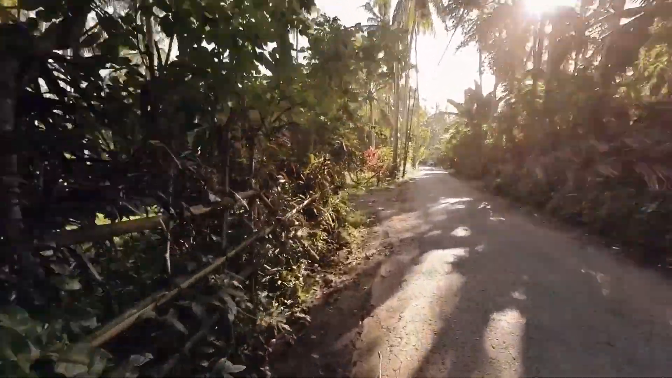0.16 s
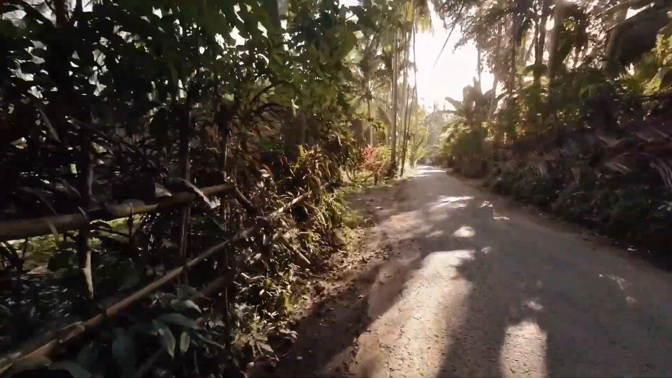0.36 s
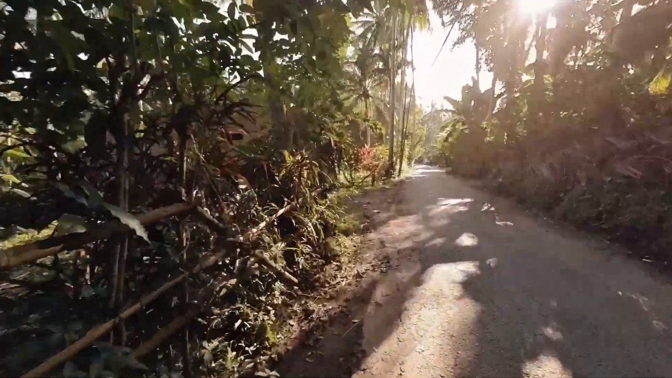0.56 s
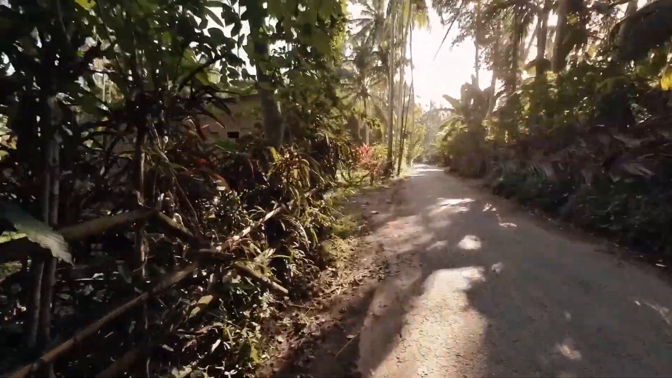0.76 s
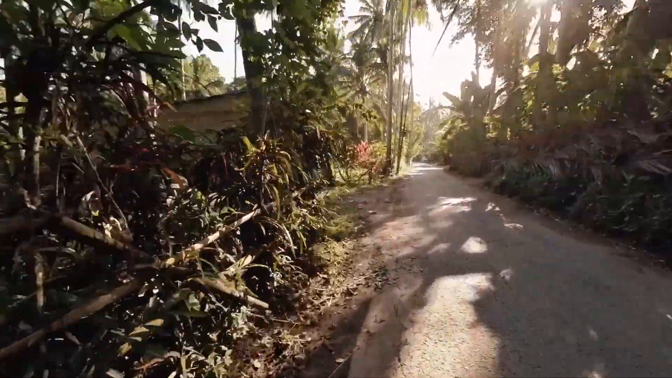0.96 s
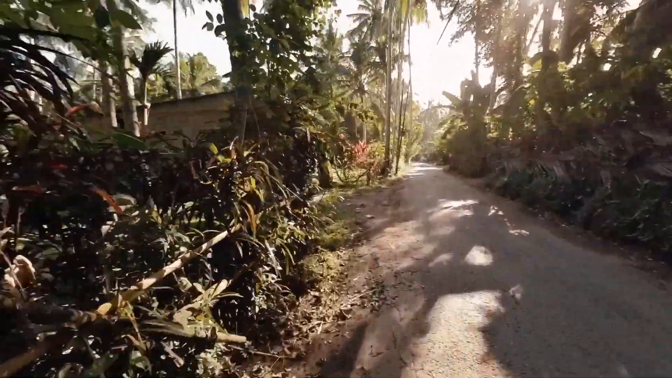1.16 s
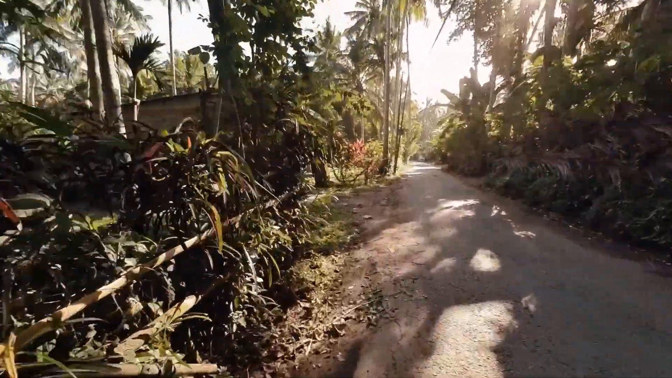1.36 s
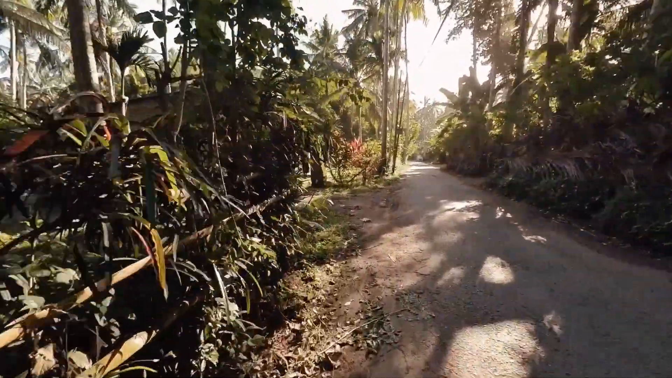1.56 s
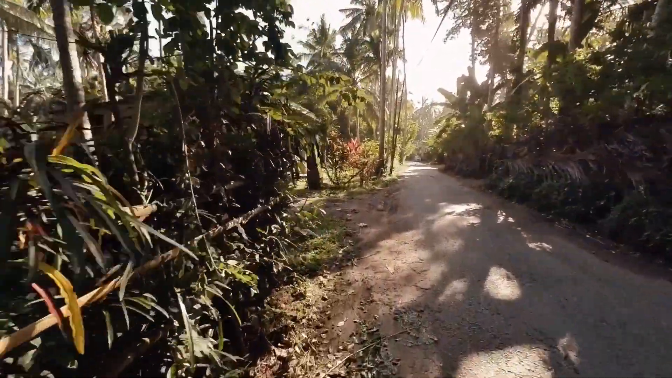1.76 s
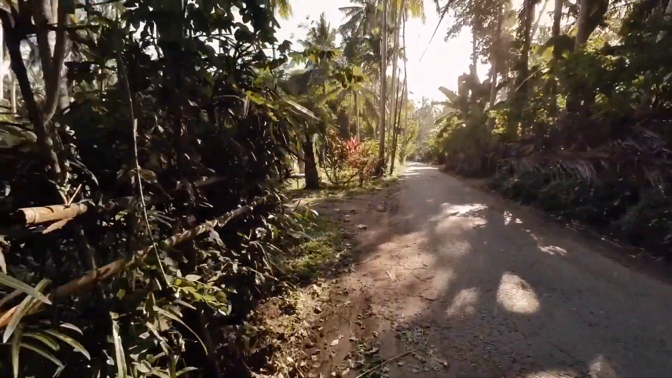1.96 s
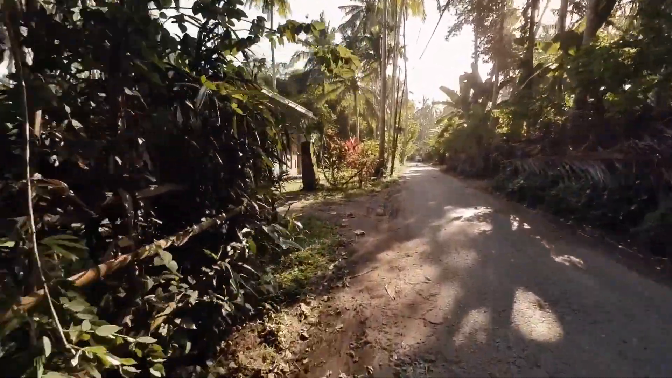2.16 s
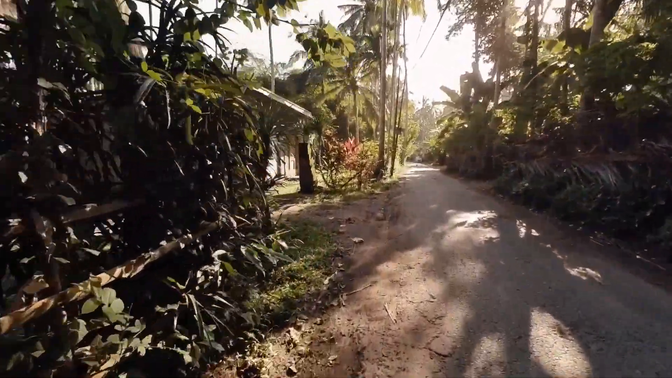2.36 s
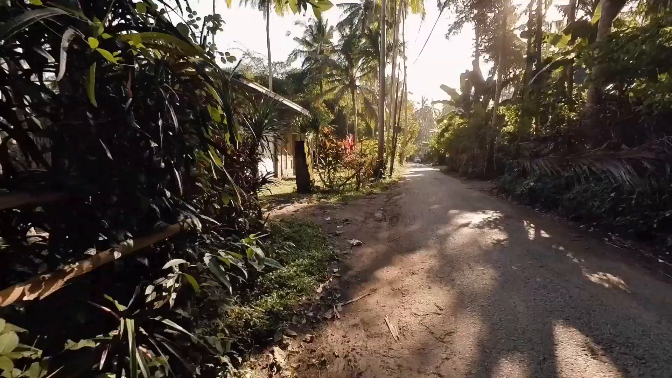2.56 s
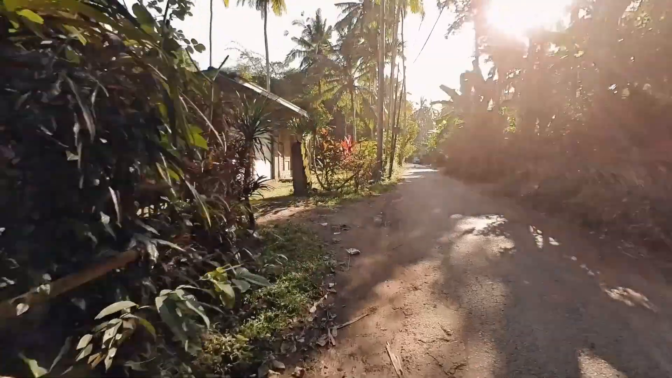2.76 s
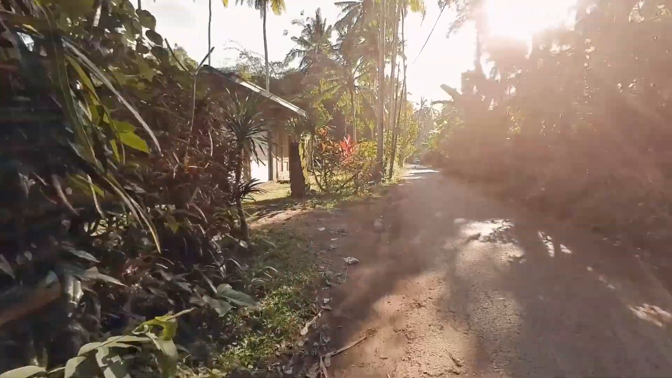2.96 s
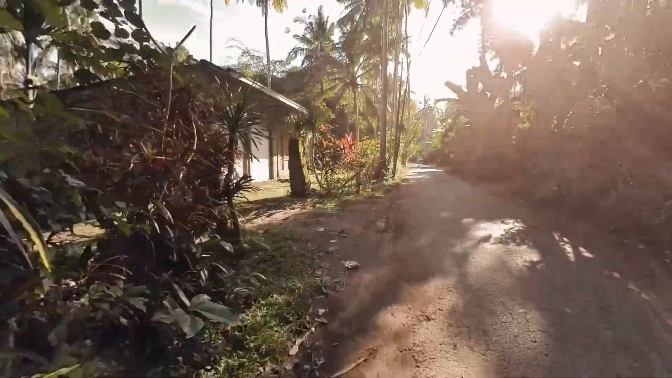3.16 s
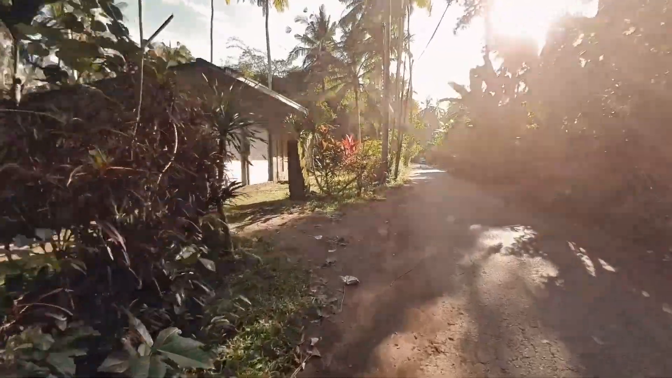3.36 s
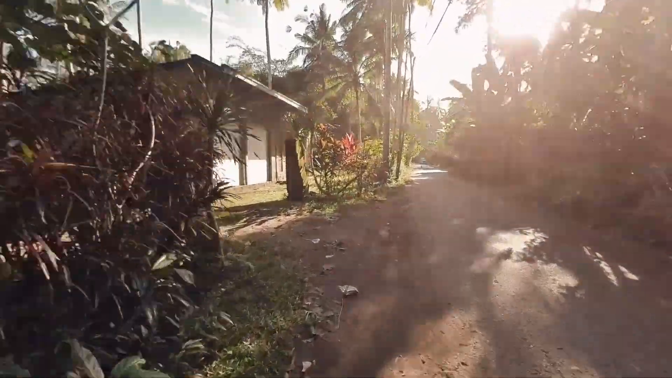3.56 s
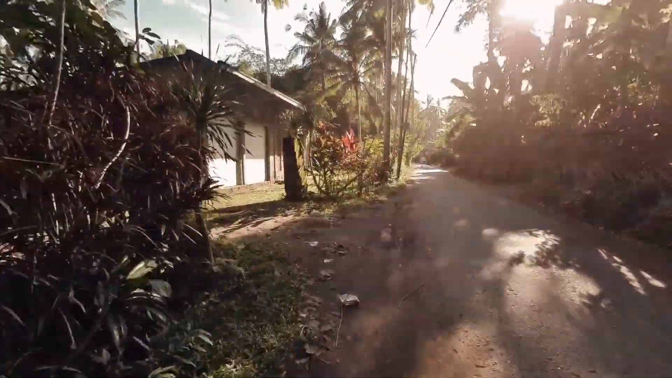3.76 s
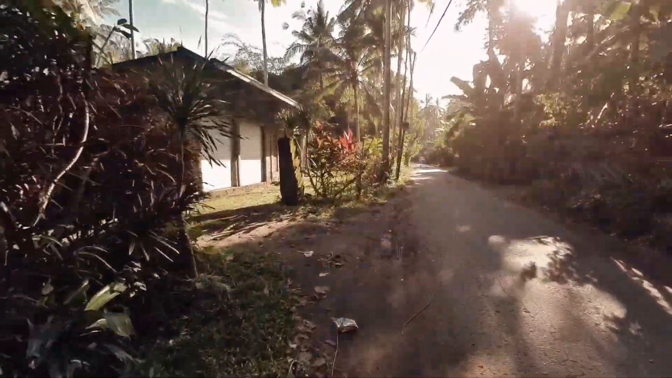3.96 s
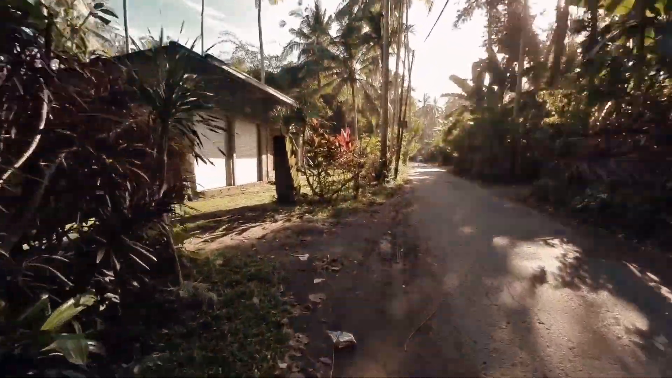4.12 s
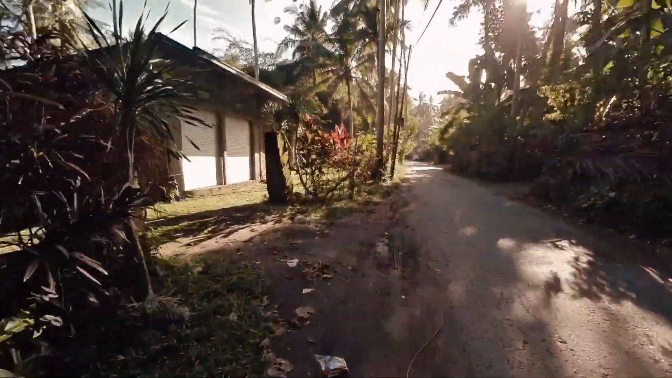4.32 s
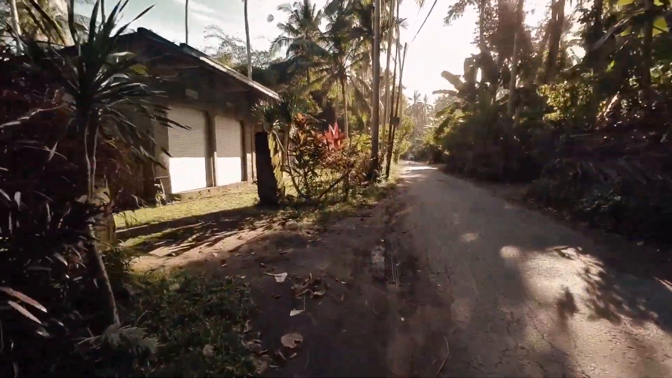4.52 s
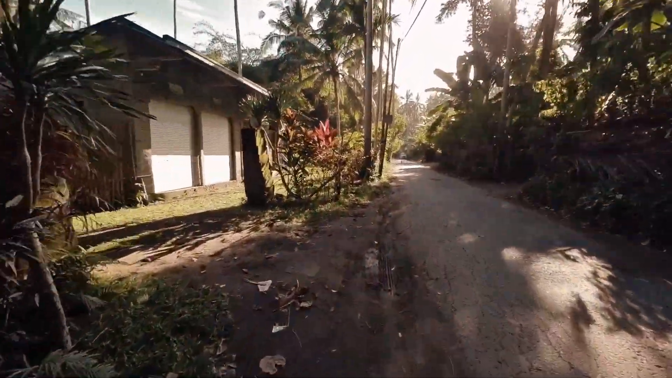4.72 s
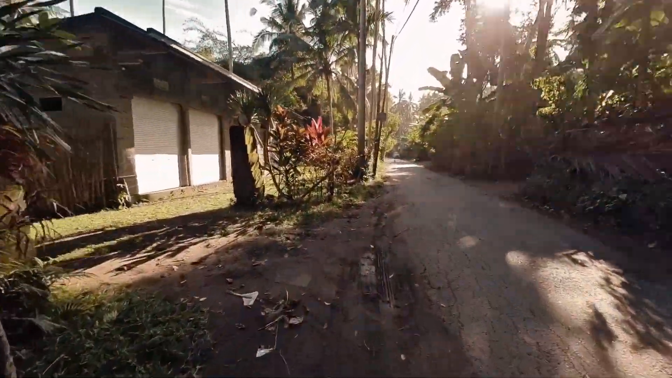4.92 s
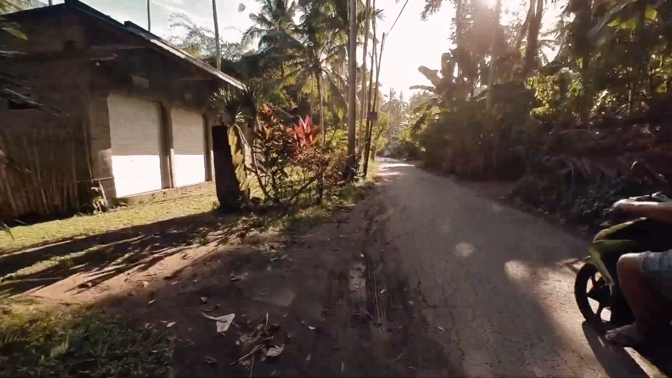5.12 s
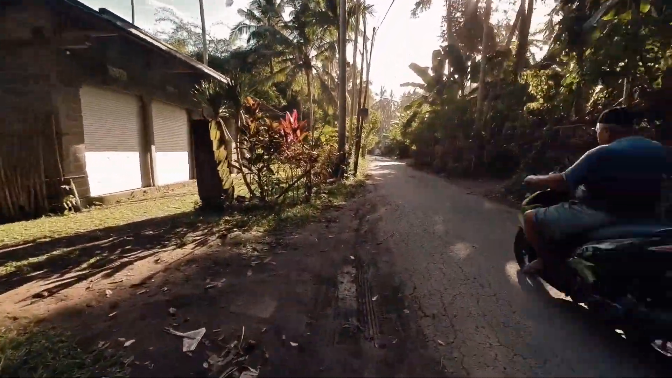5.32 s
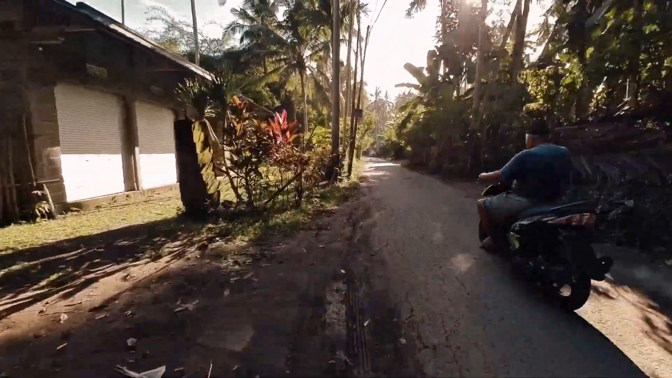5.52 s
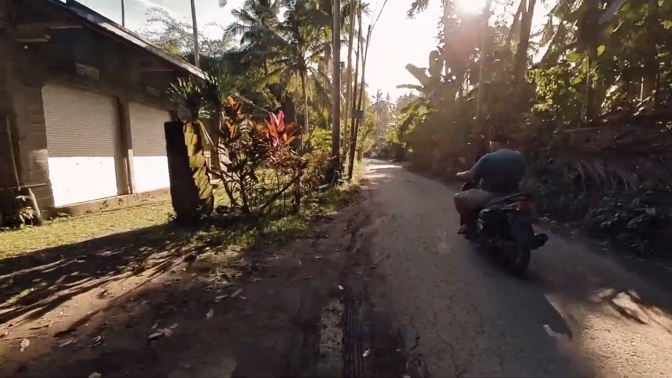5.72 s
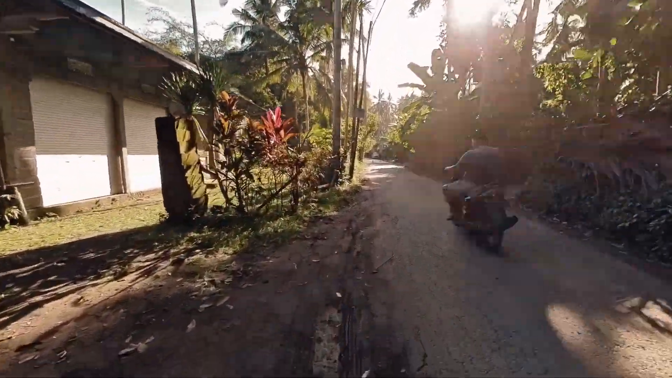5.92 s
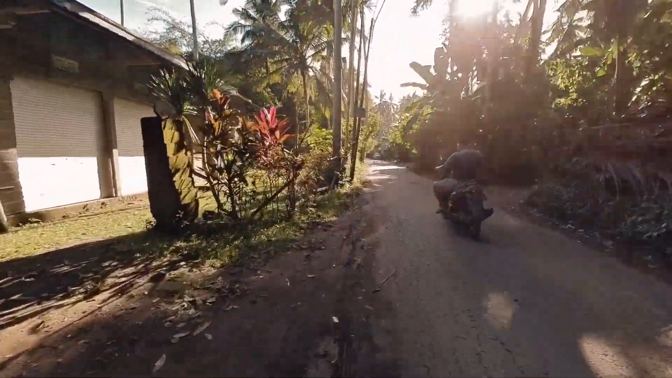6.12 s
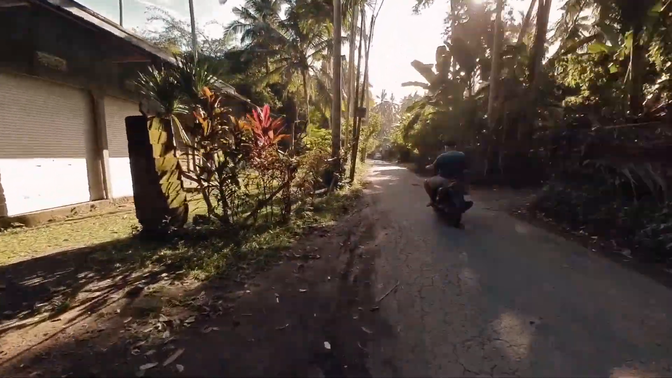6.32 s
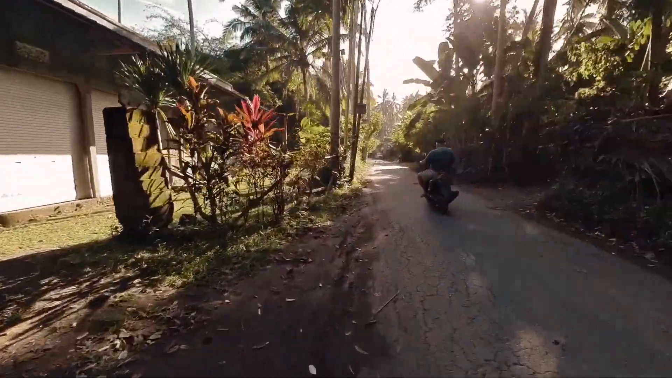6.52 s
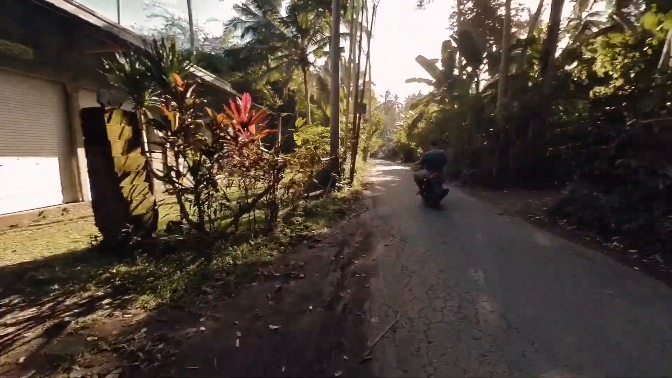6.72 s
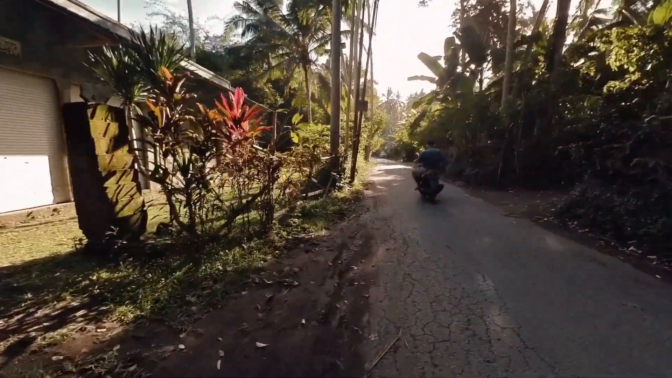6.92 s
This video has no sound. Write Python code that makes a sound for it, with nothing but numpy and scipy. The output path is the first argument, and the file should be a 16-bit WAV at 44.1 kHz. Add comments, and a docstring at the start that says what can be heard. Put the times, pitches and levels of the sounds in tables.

```python
"""A walker's steps thump and scuff softly on a narrow lane while the trees rustle. From behind comes a
small single-cylinder motorbike, barely above idle: its firings drone in the silencer, its piston knocks,
its valves tick and its tyres crunch over grit. About five seconds in it passes close by, with hard engine
knocks and soft metallic rattles. The pipe's mouth comes into view, so the drone grows louder and deeper;
then the bike rolls away, its gears whining faintly, with a short echo from trunks and walls."""
import sys
import numpy as np
from scipy import signal
from scipy.fft import rfft, irfft, next_fast_len
from scipy.io import wavfile
from scipy.ndimage import map_coordinates

SR = 44100
rng = np.random.default_rng(int(sys.argv[2]) if len(sys.argv) > 2 else 0)


def wrap_up_sound(samples):
    """Save the sound to the file named by the first command line argument, as 16-bit audio."""
    columns = np.atleast_2d(samples).T
    # keep every value between -1 and 1, then stretch to whole-number steps
    tamed = np.clip(columns, -1, 1)
    steps = np.round(tamed * 32767).astype(np.int16)
    wavfile.write(sys.argv[1], SR, steps)


N = 307818

# engine speed: time_s, firing_rate_hz
FIRING_RATE = [(0, 31.9), (.5, 31.6), (1.15, 31.35), (1.5, 31.75), (1.85, 31.65), (2.1, 32), (2.8, 31.9),
               (3.6, 32.25), (4.3, 31.95), (5.05, 32.15), (6.1, 31.75), (6.98, 31.8)]
# silencer harmonics: firing_multiple, front_db, rear_db
SILENCER_HARMONICS = [(1, -9, -13), (2, -9, -8.5), (3, -0.5, 3.5), (4, 0.5, -3), (5, -3.5, -9.5),
                      (6, -15.5, -12), (7, -10.5, -21), (8, -8.5, -16.5), (9, -10, -47), (10, -8.5, -28),
                      (11, -20, -20), (12, -22, -28)]
# blows within the four-stroke cycle: place_cycles, decay_cycles, level_db
GAS_PULSES = [(.0, .2, -32), (0.331, 0.046, 0), (0.582, 0.068, 3.5)]
PISTON_KNOCKS = [(0.161, 0.05, 0.24), (0.661, 0.16, -1.2)]
VALVE_TAPS = [(0.87, 0.18, -2.5), (0.38, 0.065, -4.5)]
# resonances of the engine's metal: centre_hz, width_hz, gain_db
CASING_MODES = [(827, 87, 4), (937, 85, 0), (1074.4, 64, 2.5), (1178, 116, -1), (1331, 50, -1.5),
                (1510, 160, -11.5), (1710, 63, -11), (1852, 28, -10), (2054, 140, -13.5)]
HEAD_MODES = [(2940, 130, 2.5), (3030, 81, 4.5), (3320, 640, -2.5), (5010, 280, 4), (5960, 660, -4.5),
              (8000, 550, -20)]
# gear tones heard from behind: firing_multiple, level_db
GEAR_TONES = [(34, -35), (43, -36.5), (49, -41), (58, -45)]
# the engine's hardest knocks: start_s, level_db, pitch_hz
HARD_KNOCKS = [(4.994, -8.5, 1000), (5.001, -15.5, 1210), (5.039, -12.5, 800), (5.103, -14, 870),
               (5.116, -13, 900), (5.15, -13, 745), (5.198, -9, 780), (5.232, -11, 775),
               (5.266, -13.5, 720), (5.302, -16, 720), (5.368, -11.5, 1250), (5.386, -13.5, 950),
               (5.574, -9.5, 1120), (5.795, -14.5, 900), (5.812, -18, 880), (5.889, -18, 870),
               (5.983, -13.5, 1060), (6.218, -17.5, 829), (6.834, -21.5, 880)]
# sharp valve ticks and soft metallic rattles of the passing bike: start_s, length_s, level_db, pitch_hz
TICKS_AND_RATTLES = [(5.004, 0.006, -33.5, 5800), (5.347, 0.0051, -28, 5060), (5.476, 0.005, -36, 5000),
                     (5.715, 0.048, -38, 3080), (5.812, 0.0073, -33.5, 3100), (6.216, 0.05, -39, 3100),
                     (6.28, 0.078, -43, 2950), (6.385, 0.026, -40, 3250), (6.668, .025, -50, 5460),
                     (6.77, 0.064, -47, 2950)]
# directivity of each part, every 30 degrees from ahead to behind: level_db
DRONE_PATTERN = (-23, -24.5, -28, -26.5, -25, -24, -25)
PUFF_PATTERN = (-25.5, -34, -35, -35.5, -31, -26.5, -20.5)
KNOCK_PATTERN = (-42, -34.5, -26, -35.5, -28, -27, -21)
VALVE_PATTERN = (-51, -52.5, -46, -39, -35, -33, -34.5)
TYRE_PATTERN = (-34.5, -31, -26, -24, -25.5, -31.5, -33)
# footfalls: start_s, level_db
FOOTFALLS = [(0.186, -33), (0.773, -35), (1.331, -51), (1.888, -31), (2.428, -32), (3.008, -41)]
# soles crunching grit and dry leaves: start_s, length_s, level_db, pitch_hz
SOLE_SCUFFS = [(0.005, 0.033, -51, 2200), (0.088, 0.014, -54, 4500), (0.301, 0.03, -53, 3200),
               (0.493, 0.02, -49.5, 4000), (0.495, 0.09, -49, 1500), (0.555, 0.05, -57.5, 5000),
               (1.719, 0.023, -57, 7000), (2.708, 0.057, -49.5, 4800), (2.745, 0.055, -52, 5600),
               (3.845, 0.038, -50.5, 5200)]
# single cracks within the crunches: start_s, level_db, pitch_hz
SOLE_SNAPS = [(0.318, -39, 3200), (0.497, -41, 7000), (0.503, -39, 4200), (0.589, -41, 3200),
              (1.742, -34.5, 790), (2.703, -39, 3000), (2.725, -35, 4270), (2.769, -37, 4800),
              (3.853, -34, 4000), (3.863, -35, 4500)]
# spectra of the noise sources: frequency_hz, gain_db
PUFF_SPECTRUM = [(20, -8), (60, -7.5), (150, -3), (260, 0), (330, -3.5), (390, 0.5), (460, -5.5),
                 (540, -4.5), (660, -16.5), (1200, -38), (3000, -45)]
GRIT_SPECTRUM = [(100, -35.5), (400, 0.5), (600, 2), (800, 1.5), (1250, 3), (1700, 0.5), (2400, -4),
                 (3100, -9), (4000, -18), (6000, -15.5), (8000, -27.5), (11000, -33.5), (15700, -40)]
TREAD_SPECTRUM = [(2000, -30), (5500, -2), (9000, 1), (13500, 2.5), (15700, -4)]
TREE_SPECTRUM = [(20, -2), (60, -5), (130, 0), (250, -15.5), (400, -15.5), (600, -9.5), (850, -6),
                 (1250, -17.5), (1800, -23.5), (2800, -25), (4200, -36), (6000, -34.5), (9500, -46.5),
                 (15500, -41)]
# reverberation time of the lane: frequency_hz, t60_s
LANE_DECAY = [(100, 0.12), (1000, 0.15), (10000, 0.13)]
# stereo width: frequency_hz, side_gain_db
STEREO_WIDTH = [(1800, -80), (2600, -57), (3600, -0.5), (5000, -8.5), (7000, -25), (10000, -1.5),
                (13000, -7.5), (15000, -49)]
# response of the microphone port: frequency_hz, gain_db
PORT_RESPONSE = [(3000, 0), (4400, -1.5), (4700, -0.5), (5050, -2), (5500, -2), (6000, -0.5), (6500, -1.5),
                 (7000, -3.5), (8000, -2.5), (9300, -8.5), (10300, -7.5), (11500, -8.5), (13400, -1.5),
                 (15500, -9)]

PASS_S, CLOSEST_M, BIKE_M_PER_S = 5.217, 1.905, 4.09  # closest approach and road speed
CLEAR_S, CLEAR_TAKES_S, CLEAR_DB = 5.168, .01, 5.5  # the pipe's mouth comes out from behind the bike
FAR_FACING = 0.3  # share of the tailpipe's direct sound left far down the lane


def exhaust(cycle, distance, bearing, dispersion_rad=.9, waver_db=0.1764, fade_db=1.1):
    """Periodic excitation: the silencer smears the firings into a drone, deeper when its mouth shows."""
    clear = .5 + .5 * np.tanh((np.arange(N) / SR - CLEAR_S) / (2 * CLEAR_TAKES_S))
    facing = np.clip(clear * FAR_FACING + (1 - FAR_FACING) / distance ** 2, 0, 1)
    drone, power = np.zeros(N), np.zeros(N)
    for k, front_db, rear_db in SILENCER_HARMONICS:
        gain = amp(front_db + facing * (rear_db - front_db))
        # heard by reflections from the front, each harmonic fades in and out by itself
        fading = amp((waver_db * k + fade_db * (1 - facing)) * wobble(9))
        phase_lag = dispersion_rad * k * k  # higher harmonics leave the chambers later
        drone += gain * fading * np.sin(2 * np.pi * k * cycle - phase_lag)
        power += gain ** 2 / 2
    return radiation(DRONE_PATTERN, distance, bearing) * amp(CLEAR_DB * clear) * drone / np.sqrt(power)


def engine(cycle, distance, bearing):
    """Pulsed flow and impact: gas puffs from the pipe, the piston rings the casing, valves the head."""
    puffs = colour(bursts(cycle, GAS_PULSES, scatter_db=0.7, steady=0.41), PUFF_SPECTRUM)
    knocks = resonate(bursts(cycle, PISTON_KNOCKS, scatter_db=5.5, steady=0.22), CASING_MODES)
    taps = bursts(cycle, VALVE_TAPS, scatter_db=4.5, steady=0.38)
    oiled_taps = colour(taps, [(7500, -9), (10500, -8.0), (13000, -23)])  # oil softens each tap
    ticks = resonate(oiled_taps, HEAD_MODES)
    return (radiation(PUFF_PATTERN, distance, bearing) * unit(puffs)
            + radiation(KNOCK_PATTERN, distance, bearing) * unit(knocks)
            + radiation(VALVE_PATTERN, distance, bearing) * unit(ticks))


def hard_knocks(t60_s=0.023, width_hz=750):
    """Piston slap: the engine's hardest knocks, hollow and quickly damped, stand out at the pass."""
    track = np.zeros((2, N))
    for start_s, db, hz in HARD_KNOCKS:
        ring = impact(hz, width_hz, t60_s, size=SR // 8)
        knock = colour(ring, [(200, -16.0), (700, 7.5), (2500, -3.5), (6000, -14), (10000, -37)])
        add(track, start_s, amp(db) * knock / np.abs(knock[0]).max())
    return track


def tyres(distance, bearing, hiss_db=-46):
    """Rolling noise: grit crunches; the treads' hiss beams sideways, heard only as the wheels go by."""
    grit = noise() * amp(0.99 * wobble(500) + 0.77 * wobble(40))
    crunch = radiation(TYRE_PATTERN, distance, bearing) * unit(colour(grit, GRIT_SPECTRUM))
    tread = noise() * amp(1.8 * wobble(1000))
    beam = distance ** -4
    return crunch + amp(hiss_db) * beam * unit(colour(tread, TREAD_SPECTRUM))


def gears(cycle, distance, bearing, waver_db=3, front_db=-19.5):
    """Gear mesh: teeth sing thin tones at high multiples of the firing rate, radiated mostly rearward."""
    whine = sum(amp(db + waver_db * wobble(12)) * np.sin(2 * np.pi * k * cycle + .5 * wobble(25))
                for k, db in GEAR_TONES)
    return radiation((front_db, 0), distance, bearing) * whine


def ticks_and_rattles():
    """Narrow resonance: sharp valve ticks and soft metallic rattles ring, their top treble muffled."""
    rings = scrapes(TICKS_AND_RATTLES, relative_width=0.1, grain_db=5.0)
    return colour(rings, [(6000, 2.5), (10000, -10)])


def footfalls(thump_hz=33, thump_t60_s=0.24, heel_hz=150, heel_t60_s=0.067, heel_db=4):
    """Damped oscillation: each step is a dull knock of the heel and a low, structure-borne thump."""
    track, t = np.zeros((2, N)), np.arange(SR // 4) / SR
    thump = amp(-60 * t / thump_t60_s) * np.sin(2 * np.pi * thump_hz * t)
    heel = amp(heel_db - 60 * t / heel_t60_s) * np.sin(2 * np.pi * heel_hz * t)
    for start_s, db in FOOTFALLS:
        add(track, start_s, amp(db) * (thump - heel))
    return track


def scuffs(swish_lag_s=.277, swish_s=0.079, swish_db=-61.5, swish_hz=10500):
    """Friction noise: the other foot swishes through after each step; now and then a sole crunches."""
    swishes = [(start_s + swish_lag_s, swish_s, swish_db, swish_hz) for start_s, _ in FOOTFALLS]
    return scrapes(swishes + list(SOLE_SCUFFS), relative_width=0.6, grain_db=3.5)


def snaps(t60_s=0.013, relative_width=0.44):
    """Brittle fracture: a grain of grit or a dry leaf gives way under the sole with one sharp crack."""
    track = np.zeros((2, N))
    for start_s, db, hz in SOLE_SNAPS:
        crack = impact(hz, relative_width * hz, t60_s, size=SR // 16)
        add(track, start_s, amp(db) * crack / np.abs(crack[0]).max())
    return track


def trees(level_db=-46.0, drift_db=0.63):
    """Diffuse noise: a faint rustle from all round, its level slowly drifting."""
    return amp(level_db + drift_db * wobble(1.6)) * unit(colour(noise(), TREE_SPECTRUM))


def road_bounce(x, distance, lag_s=0.001136, share=0.06):
    """Comb filtering: a copy off the asphalt lags most at the pass, so its notches sweep down and up."""
    n = np.arange(N)
    reflection = np.array([np.interp(n - lag_s * SR / distance, n, channel) for channel in x])
    return x + share * reflection


def lane_echo(x, level_db=-11.5):
    """Reverberation: trunks and walls scatter the sound into a short, exponentially decaying tail."""
    hz, t, spectra = signal.stft(noise(size=SR // 2), SR, nperseg=256)
    decay = amp(-60 * t / along(LANE_DECAY, hz)[:, None])
    tail = signal.istft(spectra * decay, SR, nperseg=256)[1]
    echo = signal.fftconvolve(x[:1], tail / np.linalg.norm(tail[0]), axes=1)
    return amp(level_db) * echo[:, :N]


def foliage_fading(x, depth_db=0.98, width_bins=2.96, length_frames=9):
    """Multipath fading: shifting paths through the foliage lift and dim small patches of the spectrum."""
    spectra = signal.stft(x, nperseg=512)[2]
    offsets = np.arange(-24, 25)
    patch = np.outer(np.exp(-(offsets / width_bins) ** 2), np.exp(-(offsets / length_frames) ** 2))
    field = signal.fftconvolve(rng.standard_normal(spectra.shape[1:]), patch, "same")
    return signal.istft(spectra * amp(depth_db * unit(field)), nperseg=512)[1][:, :N]


def ride():
    """Uniform straight motion: distance in units of the closest, bearing from 0 (coming) to 1 (going)."""
    past = (np.arange(N) / SR - PASS_S) * BIKE_M_PER_S / CLOSEST_M
    return np.hypot(1, past), .5 + np.arctan(past) / np.pi


def radiation(pattern_db, distance, bearing):
    """Directivity and spherical spreading: a part's gain towards the listener, over the distance."""
    return amp(np.interp(bearing, np.linspace(0, 1, len(pattern_db)), pattern_db)) / distance


def bursts(cycle, blows, scatter_db, steady):
    """Amplitude modulation: noise flares at set places in the cycle, each time at a new strength."""
    power = np.full(N, steady ** 2)
    for place, decay, db in blows:
        turn = cycle - place + 2  # two whole cycles keep the index positive
        chance = rng.uniform(-1, 1, int(cycle[-1]) + 8)[turn.astype(int)]
        power += (amp(db + scatter_db * chance) * np.exp(-(turn % 1) / decay)) ** 2
    return np.sqrt(power) * noise()


def impact(hz, width_hz, t60_s, size):
    """Transient excitation: a decaying burst of noise drives one resonance."""
    t = np.arange(size) / SR
    return resonate(noise(size) * amp(-60 * t / t60_s), [(hz, width_hz, 0)])


def scrapes(rows, relative_width, grain_db):
    """Granular excitation: short swells of grainy noise in a resonance."""
    track, t = np.zeros((2, N)), np.arange(SR // 4) / SR
    for start_s, length_s, db, hz in rows:
        grains = noise(size=len(t)) * amp(grain_db * wobble(920)[:len(t)])
        ring = unit(resonate(grains, [(hz, relative_width * hz, 0)]))
        age = 3 * t / length_s  # the swell peaks at a third of its length
        add(track, start_s, amp(db) * age * np.exp(1 - age) * ring)
    return track


def resonate(x, modes):
    """Modal superposition: x through (centre_hz, width_hz, gain_db) resonances of alternating sign."""
    return filtered(x, lambda f: sum(
        (-1) ** k * amp(db) * 1j * f * width / (centre * centre - f * f + 1j * f * width)
        for k, (centre, width, db) in enumerate(modes)))


def colour(x, points):
    """Minimum-phase filtering with the gains of (frequency_hz, gain_db) points."""
    gains = amp(along(points, np.fft.rfftfreq(SR, 1 / SR)))
    cepstrum = irfft(np.log(gains))
    cepstrum[1:SR // 2] *= 2  # folding onto positive time makes the filter causal
    cepstrum[SR // 2 + 1:] = 0
    ring = irfft(np.exp(rfft(cepstrum)))[:SR // 4]
    return signal.fftconvolve(np.atleast_2d(x), ring[None], axes=1)[:, :x.shape[-1]]


def filtered(x, response):
    """Linear filtering: the spectrum of x times a complex response of frequency."""
    size = 2 * next_fast_len(x.shape[-1] // 2 + SR // 4)
    spectrum = rfft(x, size) * response(np.fft.rfftfreq(size, 1 / SR))
    return irfft(spectrum, size)[..., :x.shape[-1]]


def along(points, hz):
    """Interpolation of (frequency_hz, value) points on a log axis."""
    frequencies, values = np.transpose(points)
    return np.interp(np.log(hz + 1), np.log(frequencies + 1), values)


def wobble(rate_hz):
    """Spline interpolation: a smooth curve through rate_hz random knots a second."""
    knots = rng.standard_normal(int(N * rate_hz / SR) + 4)
    return map_coordinates(knots, [np.arange(N) * rate_hz / SR])


def noise(size=N):
    """Two uncorrelated white noises, for mid and side."""
    return rng.standard_normal((2, size))


def add(track, start_s, sound):
    """Superposition of a sound on a track."""
    part = track[:, max(round(start_s * SR), 0):][:, :sound.shape[-1]]
    part += sound[..., :part.shape[-1]]


def amp(db):
    """Decibels to amplitude ratio."""
    return 10 ** (np.asarray(db) / 20)


def unit(x):
    """Normalisation to rms 1."""
    return x / np.sqrt(np.mean(x ** 2) + 1e-20)


def scene():
    """Superposition: bike, walker and trees sum in mid and side; only the treble spreads in stereo."""
    firing_hz = np.interp(np.arange(N) / SR, *np.transpose(FIRING_RATE))
    cycle = np.cumsum(firing_hz * (1 + .002 * wobble(9))) / SR
    distance, bearing = ride()
    clatter = engine(cycle, distance, bearing) + tyres(distance, bearing)
    clatter += gears(cycle, distance, bearing) + hard_knocks() + ticks_and_rattles()
    clatter = road_bounce(clatter, distance)
    surroundings = foliage_fading(clatter + lane_echo(clatter) + trees())
    mid, side = surroundings + footfalls() + scuffs() + snaps()
    side = filtered(side, lambda hz: amp(along(STEREO_WIDTH, hz)))
    return exhaust(cycle, distance, bearing) + np.array([mid + side, mid - side])


def record(dry, top_hz=15730):
    """Resonance and band limiting: the microphone port rings in the treble; nothing passes top_hz."""
    return filtered(colour(dry, PORT_RESPONSE), lambda hz: hz < top_hz)


dry = scene()
out = record(dry)
wrap_up_sound(out)
```